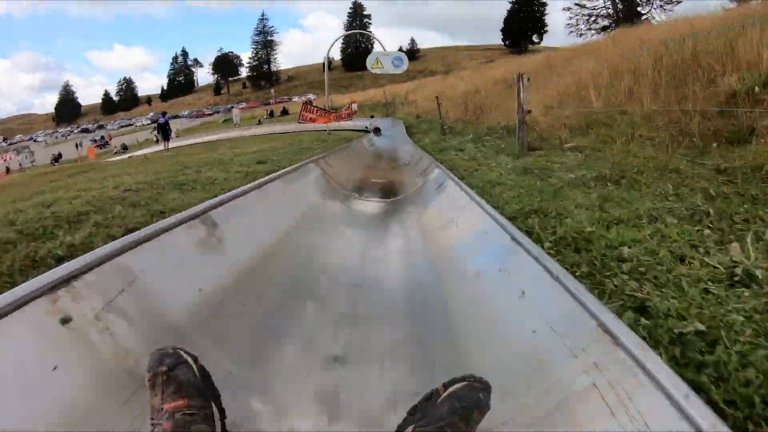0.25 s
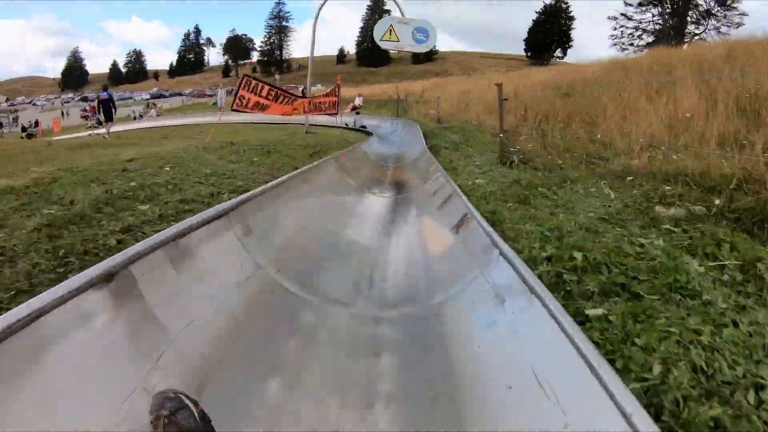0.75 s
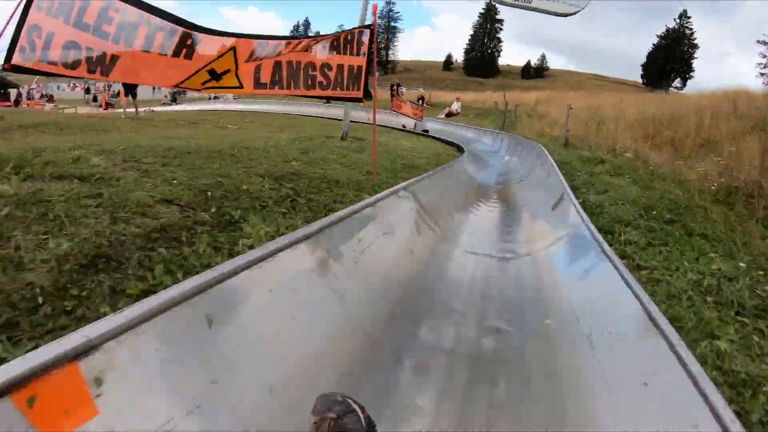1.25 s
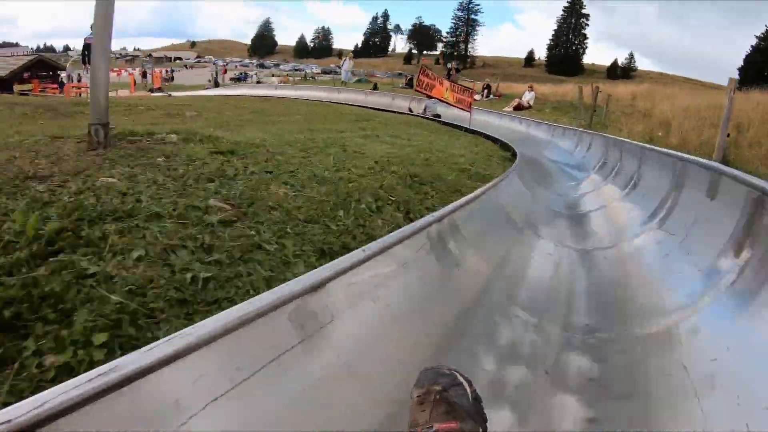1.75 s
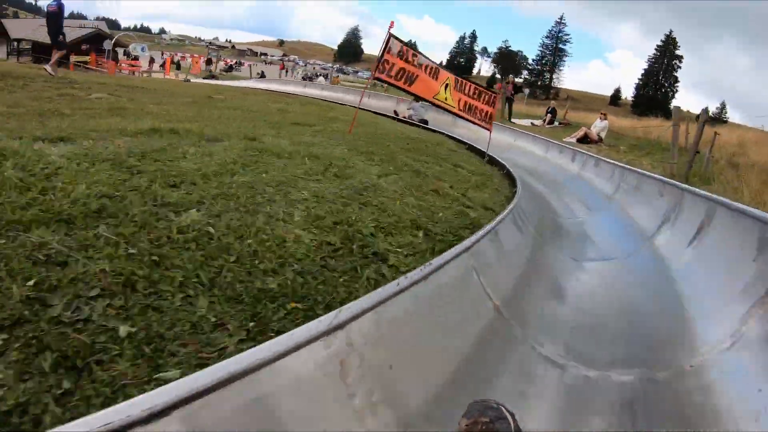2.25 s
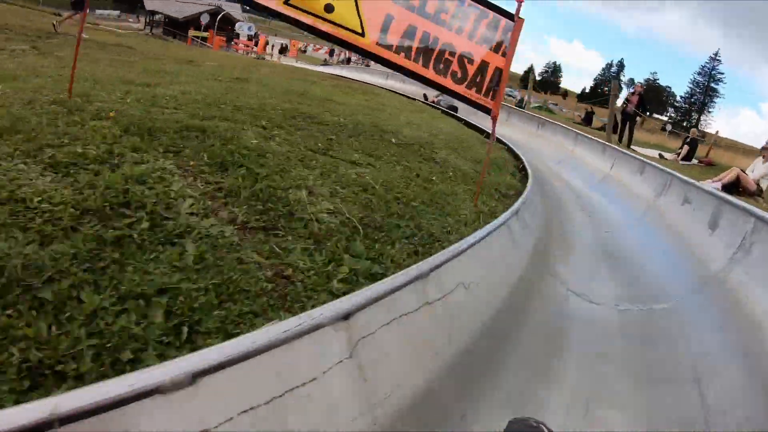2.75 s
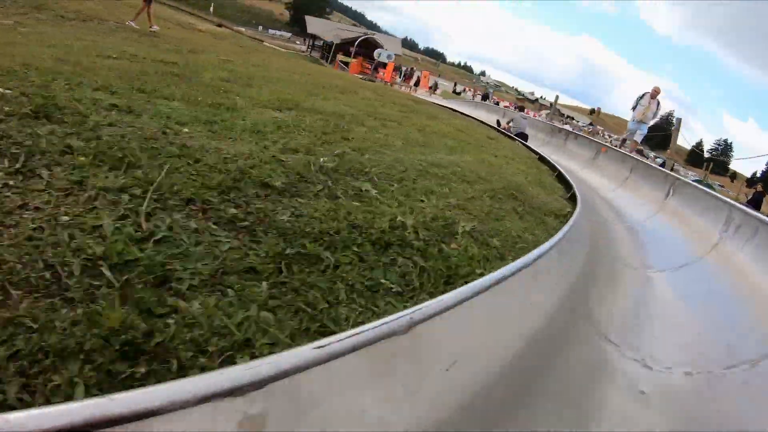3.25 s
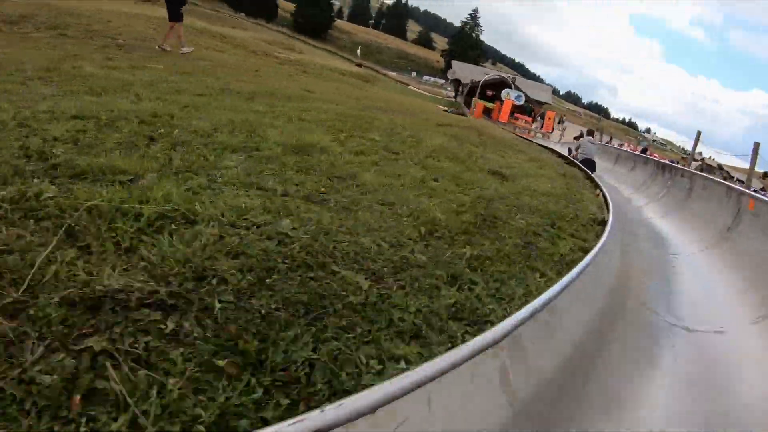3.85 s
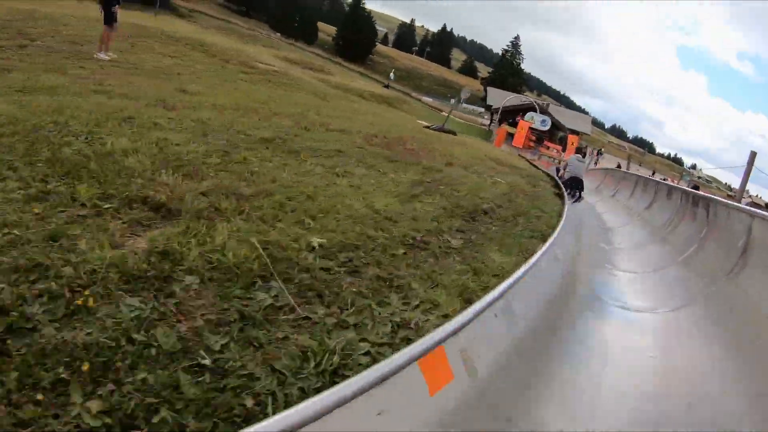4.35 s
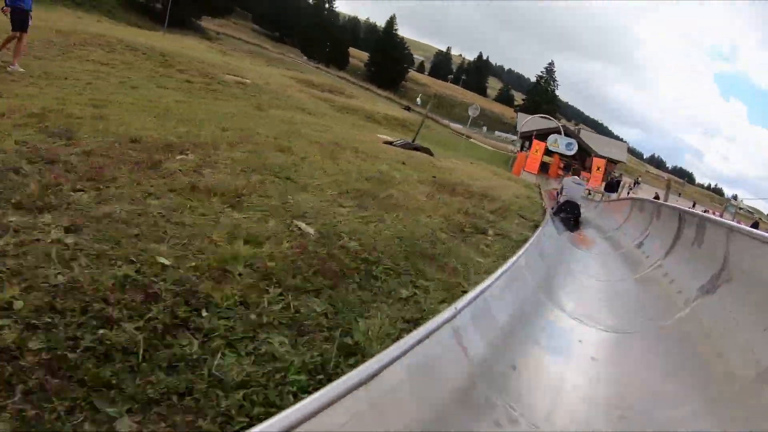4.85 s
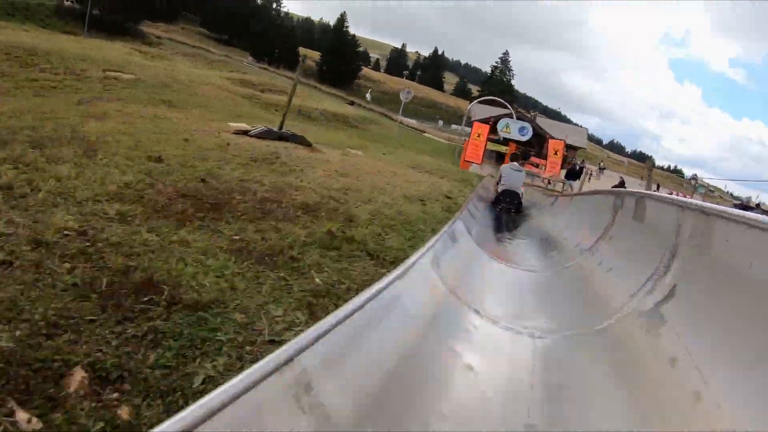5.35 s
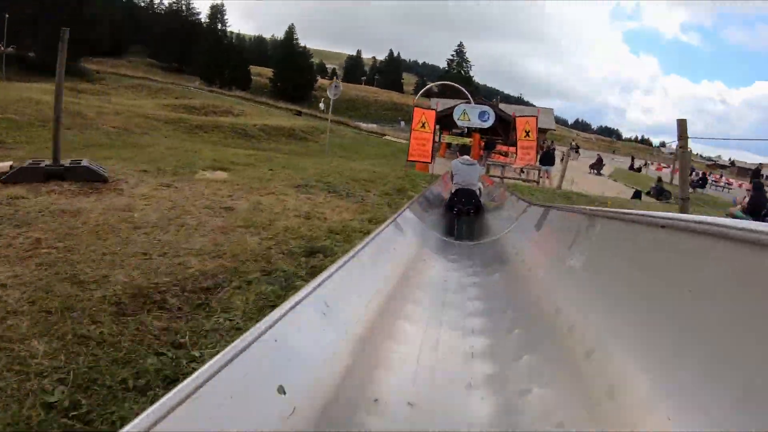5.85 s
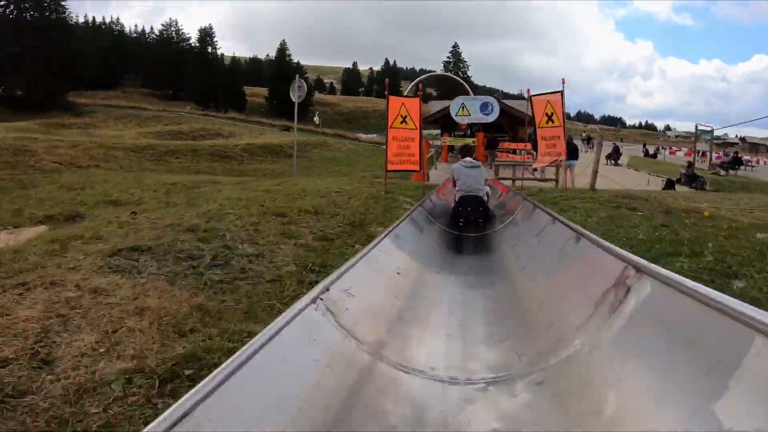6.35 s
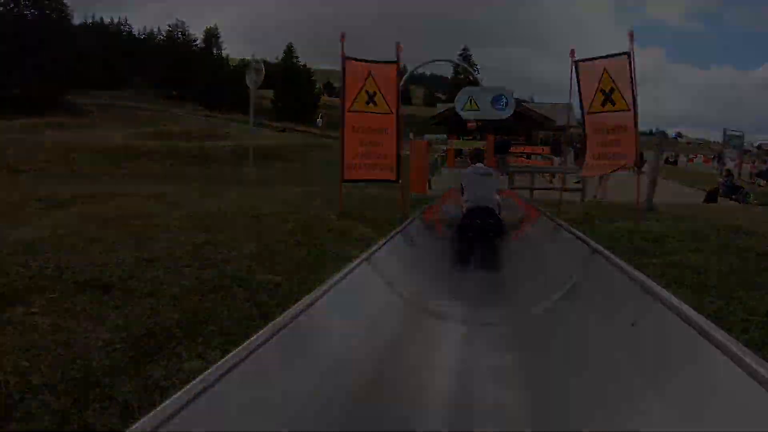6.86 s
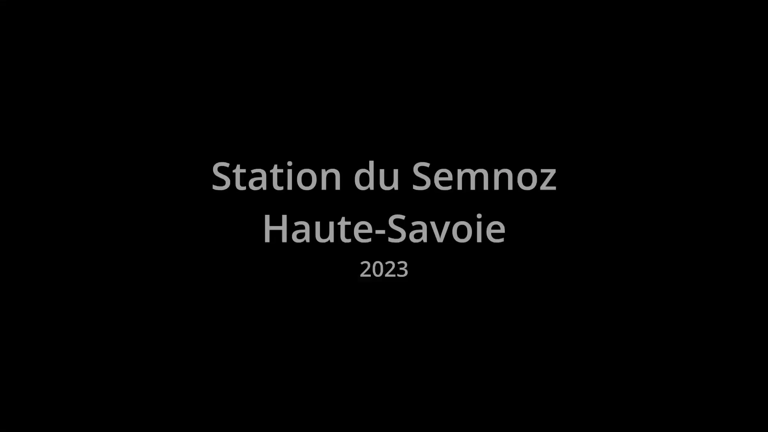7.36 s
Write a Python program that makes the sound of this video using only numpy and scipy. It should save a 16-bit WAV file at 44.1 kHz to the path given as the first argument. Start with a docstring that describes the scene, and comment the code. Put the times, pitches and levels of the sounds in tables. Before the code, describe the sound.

Heard from right on the sled: dull, boxy blows as wheels hit seams and dents in sheet metal, each with a short springy bong and shudder. Dry clatter follows many blows, densest around one second. A droning hull, hollow trough resonance and lumpy wind-like rumble fill the gaps. The middle is somewhat sparser, then hard knocks crowd together again, with a short lull before the last heavy hits and sudden silence.

```python
"""A short clatter over low rumble opens the sound; hard, uneven knocking then stands out throughout.
A wheeled sled runs down a sheet-steel trough with a small microphone on it. Each seam or dent rings the hull
and springs the sheet back; the rolling wheels keep the hull droning. Loose parts clatter in short showers of
contacts, bright strikes ping, and the wheels hiss and briefly sing. Behind them the trough rings hollow,
and low noise stands for wind and shaking. The sound ends abruptly.
"""
import sys
import numpy as np
from scipy import signal
from scipy.io import wavfile

SR = 44100
rng = np.random.default_rng(int(sys.argv[2]) if len(sys.argv) > 2 else 0)


def materialize(psi):
    """Save the field psi as 16-bit PCM at rate SR to the path in sys.argv[1].

    A 1-D psi becomes a single channel; in a 2-D psi each row is a channel.
    """
    bounded = np.clip(np.atleast_2d(psi).T, -1, 1)
    quanta = np.round(bounded * 32767).astype(np.int16)
    wavfile.write(sys.argv[1], SR, quanta)


N = 335589

# Table levels are starting points: each layer adds its own offsets and random changes.
# wheels over seams and dents: (t/s, level/dB, struck pitch f/Hz)
BLOWS = [(0.03, -21, 313), (0.084, -17, 132), (0.12, -10, 220), (0.309, -9.5, 165), (0.34, -12.5, 160),
         (0.411, -5, 147.5), (0.513, -14.5, 107), (0.596, -6, 127), (0.686, -6, 119), (0.724, -10.5, 206),
         (0.825, -4, 98), (0.855, -6.5, 101), (0.907, -7.5, 141), (1.041, -7.5, 164), (1.077, -5, 117),
         (1.133, -3, 93.5), (1.299, -8.5, 227), (1.385, -15.5, 310), (1.515, -13, 212), (1.626, -10, 220),
         (1.729, -9.5, 149), (1.86, -11.5, 124), (1.969, -9.5, 117), (2.028, -7, 199), (2.118, -12, 112.7),
         (2.163, -8.5, 180), (2.201, -11, 95), (2.304, -4.5, 202), (2.418, -6, 166), (2.496, -12, 107),
         (2.532, -5.5, 184), (2.658, -16, 94), (2.731, -9, 180), (2.846, -10, 99.4), (2.924, -9.5, 200),
         (3.061, -6, 110), (3.103, -14, 121), (3.141, -8, 213), (3.204, -16, 115), (3.301, -12, 102),
         (3.365, -7.5, 210), (3.589, -7, 157), (3.827, -6, 108), (3.977, -8.5, 92.5), (4.068, -9, 202),
         (4.222, -11, 120), (4.312, -3, 223), (4.333, -11, 296), (4.444, -11, 303), (4.485, -10.5, 304),
         (4.556, -2.5, 339), (4.584, -16, 298), (4.743, -9, 88.5), (4.827, -3, 353), (4.853, -17, 214),
         (4.987, -5.5, 272), (5.014, -4.5, 204), (5.115, -10, 328), (5.135, -3, 234), (5.158, -7.5, 262),
         (5.202, -13, 190), (5.313, -5.5, 94), (5.337, -8, 232), (5.361, -15.5, 285), (5.532, -9, 290),
         (5.564, -9.5, 247), (5.745, -10, 103), (5.77, -4, 149), (5.939, -3, 112), (5.983, -2.5, 220),
         (6.047, -10, 96), (6.179, -3.5, 123), (6.206, -5, 105), (6.246, -12, 240), (6.629, -5, 107.7),
         (6.658, -3.5, 91), (6.712, -4.5, 209.5), (6.769, -14, 122), (6.82, -26, 96.5), (6.905, -6, 131),
         (6.932, -2, 128), (6.975, -15, 201), (7.016, -11, 152)]
# ways the hull and trough vibrate: (f/Hz, level/dB, time to fall 60 dB t60/s)
HULL_MODES = [(110.2, -8, 0.2), (124, -5.5, 0.043), (166.8, 3.5, 0.025), (208.7, -2.5, 0.1),
              (233.3, -0.5, 0.063), (287.2, 5.5, 0.056), (348.5, 0, 0.047), (399, -6.5, 0.064),
              (515, -10, 0.013), (630, -8, 0.0069)]
# the run between blows: (t/s, rumble level/dB, hull drone level/dB)
RUN_LEVELS = [(0.05, -16.5, -15), (0.33, -25, -27.5), (1.02, -19, -25), (1.5, -22.5, -23.5),
              (2.0, -18.5, -37.5), (2.45, -20.5, -35.5), (2.76, -23, -40), (3.21, -26.5, -35.5),
              (3.5, -25, -33), (3.81, -25.5, -31.5), (5.09, -34, -24.5), (5.37, -19, -25.5),
              (5.75, -25.5, -28.5), (6.08, -17, -27.5), (6.35, -25, -34.5), (6.57, -28, -27.5),
              (6.84, -14, -38), (6.9, -26, -33)]
# showers of clatter: (t/s, level/dB, treble share level/dB, length/ms, struck pitch f/Hz)
CLATTERS = [(0.008, -15.5, -12, 10, 514), (0.083, -20, -25.5, 14, 495), (0.129, -16, -27, 18, 603),
            (0.237, -20.5, -22.5, 15, 750), (0.342, -14, -44, 10, 482), (0.377, -32, -32.5, 13, 800),
            (0.428, -21, -46.5, 38, 598), (0.53, -18, -32.5, 12, 640), (0.546, -31, -29.5, 7, 1100),
            (0.607, -27.5, -47.5, 13, 540), (0.647, -20, -33.5, 12, 710), (0.687, -24.5, -36.5, 15, 525),
            (0.704, -21.5, -42, 8, 1000), (0.73, -15, -21, 11, 880), (0.762, -23, -21, 12, 1000),
            (0.798, -20.5, -24, 26, 476), (0.841, -24, -22.5, 73, 563), (0.862, -21, -32, 8, 1100),
            (0.906, -20.5, -29, 6.6, 744), (1.032, -21, -26, 12, 700), (1.041, -7, -21.5, 12, 600),
            (1.05, -14, -17, 19, 804), (1.056, -7.5, -20, 21, 530), (1.147, -9, -33.5, 35, 550),
            (1.167, -12.5, -23, 9.8, 730), (1.201, -24, -35, 7.3, 1050), (1.314, -20.5, -40, 120, 520),
            (1.392, -13.5, -41, 12, 550), (1.449, -17, -55, 3.3, 533), (1.476, -35, -39, 13, 581),
            (1.525, -17.5, -51, 3.5, 482), (1.56, -18, -57, 15.6, 571), (1.617, -16, -33, 35, 540),
            (1.828, -34, -23, 14, 900), (1.853, -36, -29, 9.8, 576), (2.022, -30, -20, 13, 800),
            (2.043, -30, -15.5, 22, 686), (2.09, -45, -6.5, 26, 592), (2.159, -23, -26, 30, 685),
            (2.194, -26, -23, 10, 490), (2.299, -18, -29, 40, 482), (2.332, -14.5, -20.5, 10.3, 590),
            (2.41, -21, -20, 19, 650), (2.437, -22, -22, 11, 530), (2.528, -22.5, -26, 18, 480),
            (2.569, -29, -35, 4.5, 900), (2.656, -29.5, -34, 14, 875), (2.694, -31, -14, 17, 600),
            (2.716, -21, -24, 17, 570), (2.742, -27, -16, 14, 500), (2.858, -30, -21, 56, 800),
            (2.934, -22.5, -27, 22, 600), (3.059, -28, -23.5, 53, 915), (3.144, -28.5, -19.5, 20, 654),
            (3.294, -25.5, -23, 29, 825), (3.35, -20.5, -28.5, 33, 614), (3.415, -32.5, -21, 14, 1000),
            (3.568, -24.5, -26.5, 43, 950), (3.689, -32.5, -21, 10, 1000), (3.734, -20, -29, 33, 610),
            (3.832, -17, -35, 29, 543), (3.909, -42, -16, 19, 600), (3.981, -16, -29, 20, 660),
            (4.031, -29, -24, 13, 630), (4.057, -23, -27, 7.5, 1150), (4.065, -17, -32, 6.1, 969),
            (4.089, -18.5, -37, 18, 886), (4.148, -28.5, -39, 30, 643), (4.158, -27, -33, 8, 1300),
            (4.216, -23.5, -29, 83, 573), (4.236, -30, -37, 47, 604), (4.313, -6.5, -29.5, 13.8, 585),
            (4.443, -17, -50.5, 12, 482), (4.482, -22.5, -20, 8.9, 506), (4.51, -20.5, -37.5, 36, 580),
            (4.562, -12.5, -21.5, 7.2, 525), (4.579, -16.5, -34, 25, 515), (4.752, -19, -46, 15, 486),
            (4.825, -32, -29, 13, 500), (4.842, -15.5, -33, 29, 600), (4.99, -13.5, -35.5, 51, 494),
            (5.027, -15.5, -35.5, 16, 482), (5.101, -36, -26, 8, 900), (5.144, -20, -29.5, 14, 830),
            (5.161, -10.5, -26.5, 14, 540), (5.183, -10.5, -33, 8.6, 490), (5.302, -26, -34, 30, 900),
            (5.336, -16, -31.5, 29, 510), (5.363, -23, -38, 16, 651), (5.523, -23.5, -29, 24, 650),
            (5.575, -18, -44, 13, 534), (5.629, -47, -31, 7, 900), (5.737, -15, -38, 29, 560),
            (5.779, -27, -27, 60, 549), (5.957, -18.5, -37, 41, 660), (5.999, -12, -29, 10, 637),
            (6.036, -33, -12, 11, 600), (6.047, -15.5, -42, 17, 620), (6.121, -32.5, -34, 10, 1000),
            (6.189, -14, -38.5, 12, 595), (6.216, -16.5, -29, 41, 610), (6.244, -19.5, -32.5, 14, 605),
            (6.368, -37.5, -16, 27, 560), (6.632, -12.5, -31, 51, 497), (6.651, -11.5, -23.5, 34, 511),
            (6.696, -26, -30.5, 22, 482), (6.813, -26, -34, 35, 600), (6.93, -17.5, -28, 21, 571),
            (6.953, -15.5, -22, 19, 540), (6.988, -34, -13, 36, 912)]
# ways the loose parts vibrate: (f/Hz, level/dB, t60/s)
PART_MODES = [(461, -8, 0.051), (620, 6, 0.009), (806, -12.5, 0.012), (905, 0, 0.017), (994, -2.5, 0.028),
              (1153, -0.5, 0.014), (1358, -15, 0.037), (1606, -9, 0.026)]
# tone colour of the clatter's middle rasp: (f/Hz, level/dB per Hz)
MIDDLE_RASP = [(900, -8), (1600, 12), (2000, -5.5), (2400, 0), (3200, -5.5), (5000, -30)]
# tone colour of the clatter's bright rasp: (f/Hz, level/dB per Hz)
BRIGHT_RASP = [(2200, -17.5), (3700, 4.5), (5500, -5), (6800, -14.5), (8000, 14), (9800, -16.5),
               (11500, -26), (14000, -14.5), (16000, -10)]
# faint ringing of the steel: (f/Hz, width/Hz, lift above the driving sound/dB)
STEEL_MODES = [(1550, 120, 2), (2370, 70, 7), (2540, 90, 6), (3100, 70, 7), (3680, 50, 5), (5140, 40, 5),
               (5720, 30, 6), (5945, 25, 7), (7430, 200, 4)]
# bright strikes on the steel: (t/s, level/dB, f/Hz, length/s)
STRIKES = [(0.339, -41, 2020, 0.015), (0.372, -38.5, 2280, 0.01), (0.62, -49, 2300, 0.025),
           (0.729, -23, 1290, 0.02), (1.052, -27.5, 8000, 0.049), (1.065, -39, 2550, 0.17),
           (1.071, -33, 2375, 0.13), (1.096, -41, 2540, 0.14), (1.141, -31, 2500, 0.082),
           (1.168, -34, 2500, .08), (1.165, -34, 3700, 0.03), (1.85, -36, 1360, 0.036),
           (2.33, -38, 3880, 0.049), (2.332, -36, 7360, 0.025), (2.414, -59, 7450, 0.13),
           (2.54, -43, 3900, .05), (2.711, -39, 3800, .04), (2.952, -42, 3320, 0.055),
           (3.308, -33, 1680, 0.038), (3.527, -44, 1860, 0.045), (3.91, -40, 2400, 0.022),
           (3.975, -32.5, 1680, 0.043), (4.032, -42, 3840, .02), (4.052, -33.5, 1220, 0.022),
           (4.066, -43.5, 3930, 0.051), (4.086, -44, 3270, .03), (4.133, -50, 3300, .03),
           (4.214, -45, 2650, 0.018), (4.251, -42.5, 2820, .02), (4.307, -35, 7930, 0.067),
           (4.311, -39.5, 4730, 0.022), (4.481, -33, 1780, 0.046), (4.482, -51, 7440, 0.026),
           (4.522, -36.5, 1780, 0.04), (4.554, -44, 7800, 0.069), (4.762, -55, 3130, .06),
           (5.167, -37.5, 3820, .04), (5.176, -54, 5610, 0.025), (5.72, -51, 4470, 0.026),
           (5.734, -41, 2820, 0.044), (5.951, -44, 2990, 0.041), (6.05, -43.5, 3480, 0.018),
           (6.193, -35.5, 2550, 0.04), (6.25, -48, 3770, 0.023), (6.634, -42, 3280, .02),
           (6.66, -40.5, 3410, .03), (6.853, -54, 4030, 0.023), (6.93, -38.5, 4830, 0.02),
           (6.953, -43.5, 6800, .02), (6.954, -36, 3430, 0.019), (6.977, -47, 8350, .05)]
# wheel hiss over time: (t/s, level/dB, treble lift/dB)
HISS_LEVELS = [(0.1, -37, 7.5), (0.27, -39.5, 7.5), (0.65, -39.5, 7.5), (1.39, -41.5, 3.5),
               (1.8, -42.5, 9.5), (2.83, -41.5, 6.5), (3.4, -38.5, 5.5), (3.9, -36.5, 6), (4.4, -37.5, 3.5),
               (4.65, -42.5, 6), (5.16, -42, 7.5), (5.57, -42.5, 6), (6.08, -39.5, 3.5), (6.31, -46.5, 7.5),
               (6.56, -41, 4), (6.8, -39.5, 6.5), (6.9, -41.5, 5.5)]
# tone colour of the wheel hiss: (f/Hz, level/dB per Hz)
HISS_COLOUR = [(180, -20.5), (300, 9), (422, -21), (494, -16), (611, -12.5), (746, -14.5), (1610, -6.5),
               (1910, -21), (2920, -26), (5870, -52.5), (7810, -40), (9000, -43.5), (11700, -86),
               (19800, -120)]
# a wheel sings: (t/s, f/Hz, level/dB)
WHEEL_SONG = [(.36, 1370, -48), (.44, 1300, -37.5), (.55, 1312, -44), (.67, 1363, -50), (.74, 1320, -82.5)]
# hollow ring of the trough over time: (t/s, level/dB)
HOLLOW_LEVELS = [(0.05, -45), (1, -40.5), (1.7, -41.5), (2.2, -47), (3.2, -49.5), (4.2, -39.5), (4.6, -38),
                 (5.2, -39), (5.5, -37.5), (5.8, -39), (6.2, -41), (6.6, -42), (7, -45)]
# ways the air and sheet of the trough vibrate: (f/Hz, level/dB, t60/s)
TROUGH_MODES = [(440, -5, .03), (570, 0, .05), (625, 2, .05), (720, -5, .025)]
# tone colour of the low rumble: (f/Hz, level/dB per Hz)
RUMBLE_COLOUR = [(15, -5), (25, -5), (45, 2.5), (75, 3), (100, -7), (120, -3), (200, -8.5), (400, -56)]

SHUDDER_DB, SHUDDER_MS = -13, 18   # bounces after a blow, relative to it
BONG_DB, BONG_RISE_CYCLES, BONG_CYCLES = -8, 0.6, 3.2   # the dented sheet springs back
HUM_DB, HUM_RISE_MS, HUM_MS = -14.5, 4.1, 25   # each blow swells the hull drone
LUMPS_DB, LUMPS_PER_S = 2, 7   # bumpiness of the rumble and drone: spread and rate
MIDDLE_DB, MIDDLE_FOLLOWS = -1, 0.81   # the middle rasp follows the treble share
CRACK_DB, CRACK_MS = -3, 1.6   # sharp start of a rattle, relative to its body
SNAP_DB, SNAP_MS = -7.5, 2.6   # bright tick at the first contact
SOFTEN_MS, PEAK_AFTER = 5.6, 0.2   # bright rasp: softening of its start; rise as a share of the length
STEEL_WANDER_DB = 3.5   # each steel resonance comes and goes
PING_SCRAPE_MS, PING_FIRST = 6.5, 0.5   # shortest scrape decay; strength of the first contact
PING_RING_CYCLES, PING_SPREAD = 50, 0.03   # longest t60 in cycles; pitch spread as a share
TICKS_PER_S, TICK_DB, TICK_T60_S = 25, -11, 0.005   # grit on steel, relative to the hiss level
HOLLOW_BLOW_DB, HOLLOW_MS = -32.5, 19   # each blow swells the hollow ring
THUD_DB, THUD_HZ, THUD_RISE_MS, THUD_MS = -29, 126.7, 50, 45   # blows below this pitch swell the rumble most
TAIL_SHAPE = 0.97   # 1 dies away evenly, 2 holds and then drops
STOP_S, CAPSULE_HZ, CUTOFF_HZ = 7.0915, 9460, 15000   # end; microphone dulling; top limit


def from_db(db):
    """Turn decibels into a multiplier."""
    return np.exp(np.asarray(db) * (np.log(10) / 20))


def rms_one(x):
    """Scale a signal to an average (rms) strength of 1."""
    return x / np.sqrt(np.mean(x ** 2) + 1e-20)


def lowpass(x, order, hz):
    """Soften everything above a frequency."""
    return signal.sosfilt(signal.butter(order, hz, fs=SR, output="sos"), x)


def in_time(rows):
    """Draw straight lines between table rows, giving each column at every sample."""
    s, *columns = np.transpose(rows)
    return [np.interp(np.arange(N) / SR, s, column) for column in columns]


def drift(rate):
    """Smoothed chance of spread 1; a higher rate in Hz wanders faster."""
    r = np.exp(-80 * np.pi * rate / SR)   # worked out once every 40 samples
    noise = rng.standard_normal(N // 40 + 2002)
    slow = signal.lfilter([1], [1, -2 * r, r * r], noise)[2000:]
    return np.interp(np.arange(N) / 40, np.arange(len(slow)), rms_one(slow))


def ring(clicks, hz, t60):
    """A unit click starts a sine of height 1 that falls 60 dB in t60 seconds."""
    r, w = from_db(-60 / (t60 * SR)), 2 * np.pi * hz / SR
    return signal.lfilter([0, np.sin(w)], [1, -2 * r * np.cos(w), r * r], clicks + 1e-18)


def nearness(hz, pitch, width_oct):
    """A mode responds most when its pitch is close to the struck pitch."""
    return np.exp(-.5 * (np.log2(hz / pitch) / width_oct) ** 2)


def coloured(source, spectrum, patchy_db):
    """Split two noise streams into narrow bands with their own level and flicker; rms 1."""
    out = 0
    edges = 14 * 2 ** np.arange(0, 10.4, .4)
    hz, db = np.transpose(spectrum)
    for k, (low, high) in enumerate(zip(edges, edges[1:])):
        middle = np.log(low * high) / 2
        level_db = np.interp(middle, np.log(hz), db, left=-200, right=-200)
        if level_db > -150:
            band_filter = signal.butter(2, [low, high], "band", fs=SR, output="sos")
            band = signal.sosfilt(band_filter, source[k % 2])
            out = out + from_db(level_db + patchy_db * drift(12)) * band
    return rms_one(out)


def grit(per_s, spread_db):
    """Two streams of random contacts of uneven size."""
    sizes = from_db(spread_db * np.minimum(rng.exponential(1, (2, N)), 5))
    sizes = sizes * rng.choice([-1, 1], (2, N))
    return sizes * (rng.random((2, N)) < per_s / SR) + 1e-18


def bursts(times, gains, rises_ms, lengths_ms):
    """Envelopes that swell and die away; overlapping ones add in power."""
    power = np.zeros(N + SR)
    t_ms = np.arange(SR // 4) / SR * 1000
    for s, gain, rise, ms in np.broadcast(times, gains, rises_ms, lengths_ms):
        ms = max(ms, 3)
        u = t_ms[t_ms < 4 * ms]
        swell = (1 - np.exp(-u / max(rise, .5))) ** 2
        shape = swell * np.exp(-(u / ms) ** TAIL_SHAPE)
        power[max(round(s * SR), 0):][:len(u)] += (gain * shape / shape.max()) ** 2
    return np.sqrt(power[:N])


def steel(x):
    """Narrow resonances of the steel, lifted above the sound that drives them."""
    out = x.copy()
    for hz, width, db in STEEL_MODES:
        r = np.exp(-np.pi * width / SR)
        feedback = [1, -2 * r * np.cos(2 * np.pi * hz / SR), r * r]
        resonance = signal.lfilter((1 - r * r) / 2 * np.array([1, 0, -1]), feedback, x)
        out += (from_db(db) - 1) * from_db(STEEL_WANDER_DB * drift(3) - 1.5) * resonance
    return out


def knocks(width_oct=0.19, blow_db=-7, bounces_per_s=300, soft_hz=900):
    """Each blow, and the bounces after it, mainly strike the hull modes nearest to its pitch."""
    s, peak_db, pitch = np.transpose(BLOWS)
    at, out = np.round(s * SR).astype(int), np.zeros(N)
    bounce = rng.standard_normal((2, N)) * (rng.random((2, N)) < bounces_per_s / SR)
    signs = rng.choice([-1, 1], len(s))   # up or down; all modes start together
    for k, (hz, level_db, t60) in enumerate(HULL_MODES):
        strength = from_db(peak_db + level_db) * (0.0085 + nearness(hz, pitch, width_oct))
        clicks = bounce[k % 2] * bursts(s, strength * from_db(SHUDDER_DB), 2.1, SHUDDER_MS)
        np.add.at(clicks, at, from_db(blow_db) * strength * signs)
        out += ring(clicks, hz, t60)
    return lowpass(out, 4, soft_hz)   # rubber wheels make the contact soft


def bongs():
    """The dented sheet springs back in a few rounded cycles, sagging a little in pitch."""
    out, t = np.zeros(N + SR), np.arange(SR // 8) / SR
    for (s, db, hz), (phase, sag) in zip(BLOWS, rng.random((len(BLOWS), 2))):
        cycles = t * hz
        swell = (1 - np.exp(-cycles / BONG_RISE_CYCLES)) ** 2
        shape = swell * np.exp(-(cycles / BONG_CYCLES) ** 2)
        wave = np.sin(2 * np.pi * (cycles * (1 - sag * cycles / 60) + phase))
        out[round(s * SR):][:len(t)] += from_db(db + BONG_DB) * shape / shape.max() * wave
    return out[:N]


def hull_drone(level_db):
    """Rough steel under the wheels keeps all hull modes sounding, more so just after a blow."""
    s, peak_db, _ = np.transpose(BLOWS)
    steady = from_db(level_db + LUMPS_DB * drift(LUMPS_PER_S) - 1.0)
    level = np.hypot(steady, bursts(s, from_db(peak_db + HUM_DB), HUM_RISE_MS, HUM_MS))
    rough = grit(400, spread_db=3.5)
    modes = np.zeros(N)
    for k, (hz, db, t60) in enumerate(HULL_MODES):
        modes += from_db(db + 2.35 * drift(27.0)) * ring(rough[k % 2], hz, t60)
    return level * rms_one(modes)


def rattles(low_db=-21, mid_db=-5, high_db=-5, width_oct=0.28, tap_db=13):
    """A tap and a short shower of contacts ring the parts nearest in pitch, and rasp above."""
    s, peak_db, treble_db, ms, pitch = np.transpose(CLATTERS)
    at = np.round(s * SR).astype(int)
    rise = 0.12 * ms   # a longer shower builds up more slowly
    shower, contacts = grit(9000, spread_db=3.0), grit(1500, spread_db=3.5)
    signs = rng.choice([-1, 1], len(s))
    low = np.zeros(N)
    for k, (hz, level_db, t60) in enumerate(PART_MODES):
        strength = from_db(peak_db + level_db + low_db) * (0.34 + nearness(hz, pitch, width_oct))
        crack = bursts(s, strength * from_db(CRACK_DB), 0.71, CRACK_MS)
        clicks = contacts[k % 2] * np.hypot(bursts(s, strength, rise, ms), crack)
        np.add.at(clicks, at, from_db(tap_db) * strength * signs)
        low += ring(clicks, hz, t60)
    low = lowpass(low, 2, 2200)

    rasp = from_db(peak_db + MIDDLE_DB + MIDDLE_FOLLOWS * treble_db + mid_db)
    crack = bursts(s, rasp * from_db(CRACK_DB), .5, CRACK_MS)
    mid = np.hypot(bursts(s, rasp, rise, ms), crack) * coloured(shower, MIDDLE_RASP, patchy_db=2.0)

    swell = bursts(s, from_db(peak_db + treble_db + high_db), PEAK_AFTER * ms, 0.8 * ms)
    r = np.exp(-1000 / (max(SOFTEN_MS, 1) * SR))
    # smoothed backwards in time, which softens the start of the bright rasp
    swell = signal.lfilter([1 - r], [1, -r], swell[::-1])[::-1]
    snap = bursts(s, from_db(peak_db + treble_db + SNAP_DB), .5, SNAP_MS)
    high = np.hypot(swell, snap) * coloured(shower, BRIGHT_RASP, patchy_db=3.0)
    return low + steel(mid + high)


def pings():
    """Short scraping strikes each ring three close modes; grit ticks the steel's resonances."""
    out, t = np.zeros(N + SR), np.arange(SR // 8) / SR
    for s, db, hz, length in STRIKES:
        scrape = rng.standard_normal(len(t)) ** 3
        scrape *= np.exp(-t / max(PING_SCRAPE_MS / 1000, length / 2.4))
        touch = scrape / np.sqrt(np.sum(scrape ** 2)) + PING_FIRST * (t == 0)
        t60 = min(length / 2, PING_RING_CYCLES / hz)
        modes = sum(ring(touch, hz * (1 + side * PING_SPREAD), t60) for side in (-1, 0, 1))
        out[round(s * SR):][:len(t)] += from_db(db) * modes
    out = out[:N]
    hiss_db, _ = in_time(HISS_LEVELS)
    ticks = from_db(hiss_db + TICK_DB) * grit(TICKS_PER_S, spread_db=-1.5)[0]
    dealt = rng.integers(0, len(STEEL_MODES), N)   # which resonance each tick strikes
    for k, (hz, _, _) in enumerate(STEEL_MODES):
        weight = min(2400 / hz, 1) ** 3   # higher resonances are weaker
        out += weight * ring(ticks * (dealt == k), hz, TICK_T60_S)
    return out


def rolling():
    """Many tiny wheel contacts make hiss and crackle; its brightness varies over time."""
    level_db, bright_db = in_time(HISS_LEVELS)
    contacts = grit(6000, spread_db=3.0) + 3.5 * grit(700, spread_db=3.0)
    hiss = steel(coloured(contacts, HISS_COLOUR, patchy_db=1.6))
    bright = signal.sosfilt(signal.butter(2, 2800, "high", fs=SR, output="sos"), hiss)
    shake = from_db(2.2 * drift(45))
    return from_db(level_db) * shake * (hiss + (from_db(bright_db) - 1) * bright)


def squeal():
    """A wheel sings a faint tone, roughened by random changes in pitch and level."""
    hz, db = in_time(WHEEL_SONG)
    waver_db, waver_hz = 3.0 * drift(50), 24 * drift(60)
    return from_db(db + waver_db) * np.sin(2 * np.pi * np.cumsum(hz + waver_hz) / SR)


def hollow():
    """Scattered bumps ring the air and sheet of the trough, more so after each blow."""
    s, peak_db, _ = np.transpose(BLOWS)
    swells = bursts(s, from_db(peak_db + HOLLOW_BLOW_DB), 4.3, HOLLOW_MS)
    level = np.hypot(from_db(in_time(HOLLOW_LEVELS)[0]), swells)
    bumps = grit(350, spread_db=3.5)
    modes = np.zeros(N)
    for k, (hz, db, t60) in enumerate(TROUGH_MODES):
        modes += from_db(db) * ring(bumps[k % 2], hz, t60)
    return level * rms_one(modes)


def rumble(level_db):
    """Lumpy low noise of wind and shaking at the microphone; deep blows make it swell."""
    s, peak_db, pitch = np.transpose(BLOWS)
    depth = 1 / (1 + (pitch / THUD_HZ) ** 4)
    thuds = bursts(s, from_db(peak_db + THUD_DB) * depth, THUD_RISE_MS, THUD_MS)
    level = np.hypot(from_db(level_db + LUMPS_DB * drift(LUMPS_PER_S) - 2.0), thuds)
    return level * coloured(rng.standard_normal((2, N)), RUMBLE_COLOUR, patchy_db=2.5)


def scene():
    """Add all sources at one microphone."""
    rumble_db, drone_db = in_time(RUN_LEVELS)
    blows = knocks() + bongs() + hull_drone(drone_db)
    details = rattles() + pings() + rolling() + squeal()
    background = hollow() + rumble(rumble_db)
    return (blows + details + background)[None]


def record(dry):
    """Round the peaks, dull the treble as the capsule does, stop the sound and cut the top."""
    kept = np.clip((STOP_S - np.arange(N) / SR) / .001, 0, 1)   # fades out within 1 ms
    dull = lowpass(np.tanh(dry), 4, CAPSULE_HZ)
    return signal.sosfilt(signal.cheby2(12, 70, CUTOFF_HZ, fs=SR, output="sos"), dull * kept)


dry = scene()
out = record(dry)
materialize(out)
```